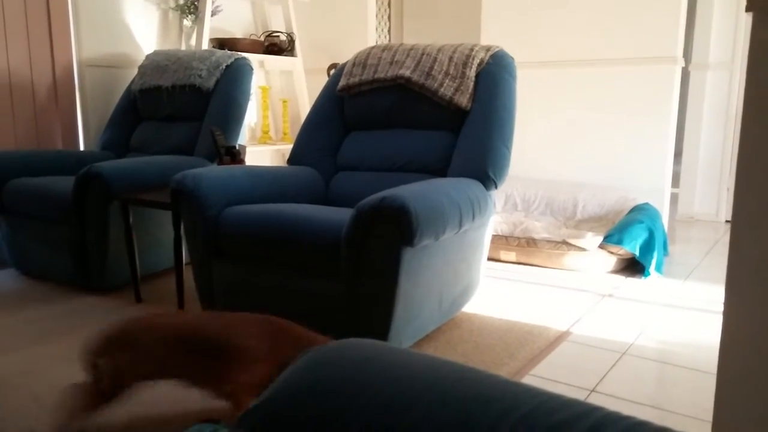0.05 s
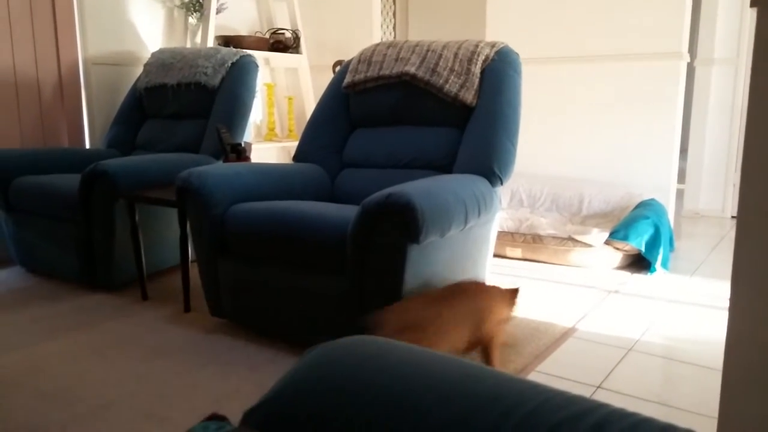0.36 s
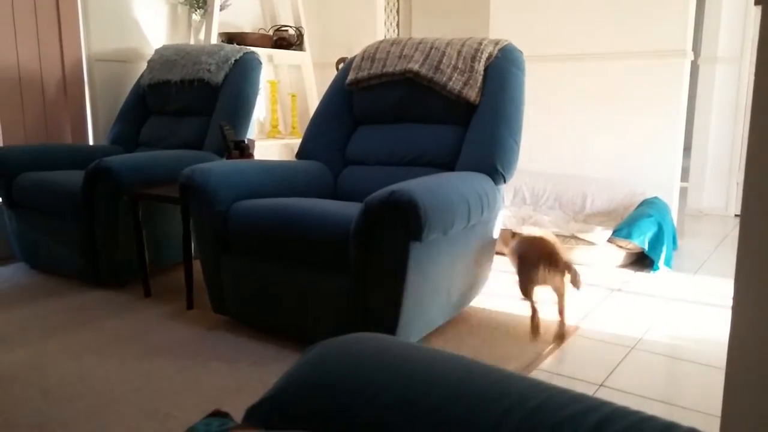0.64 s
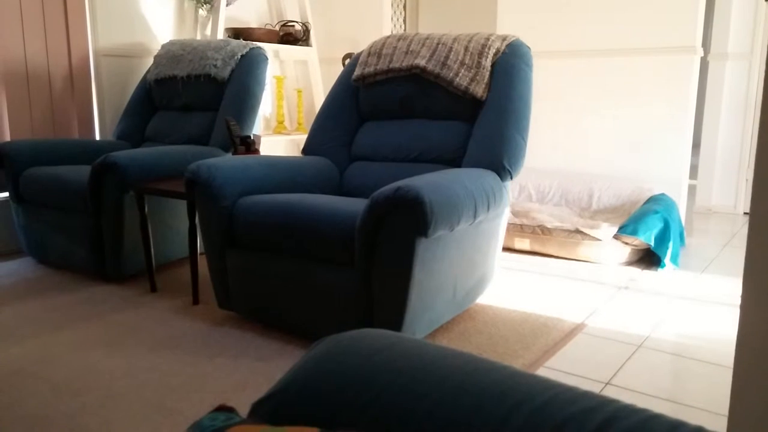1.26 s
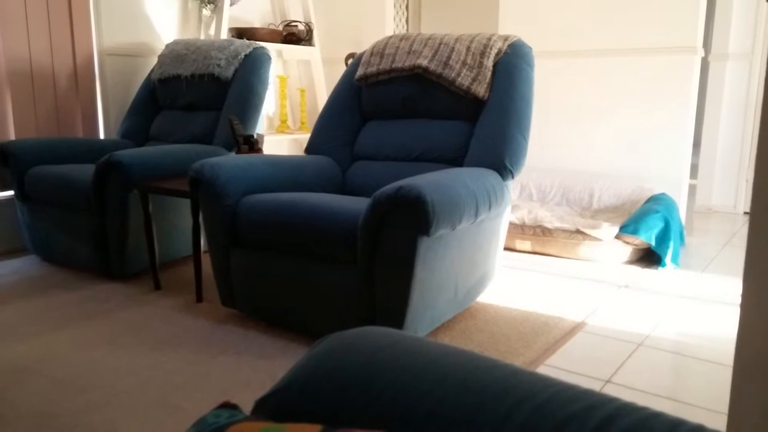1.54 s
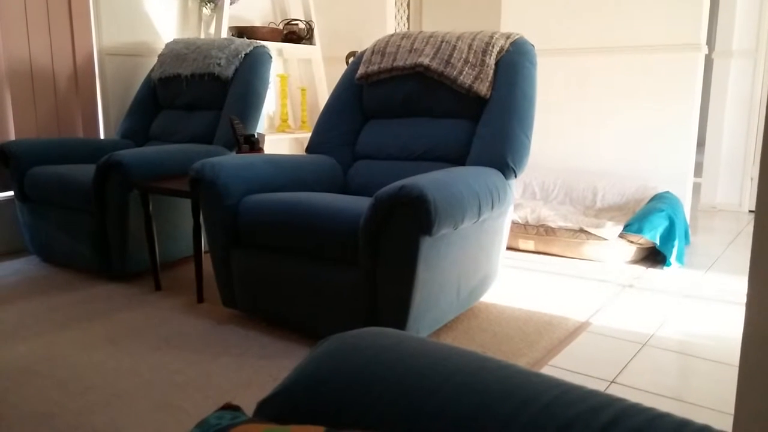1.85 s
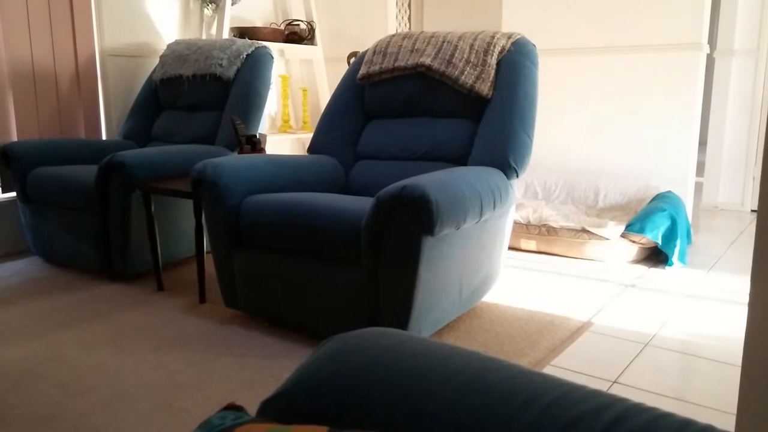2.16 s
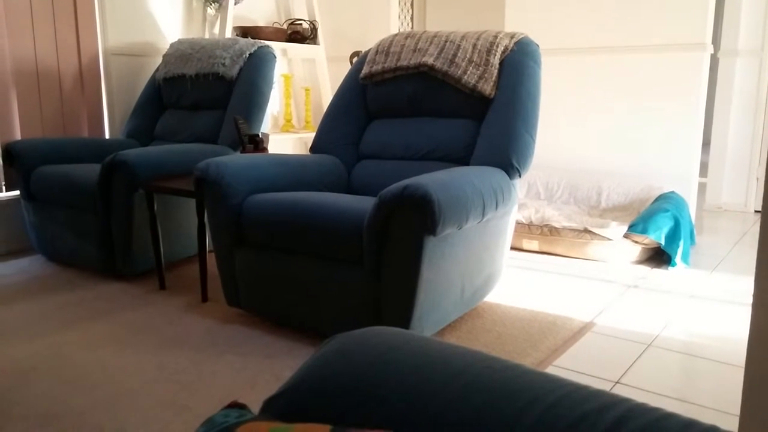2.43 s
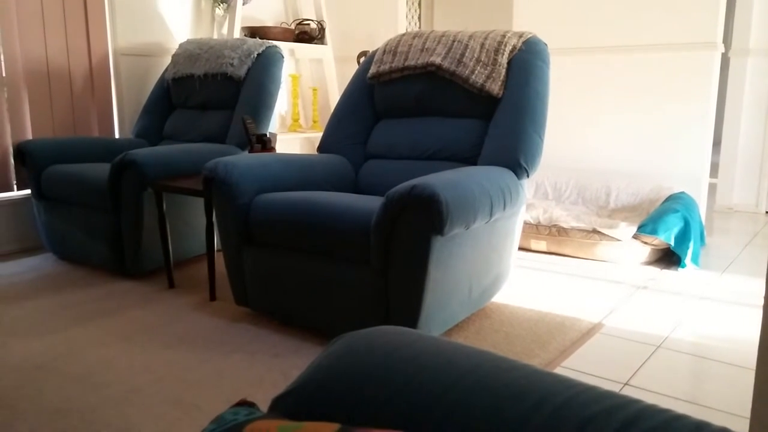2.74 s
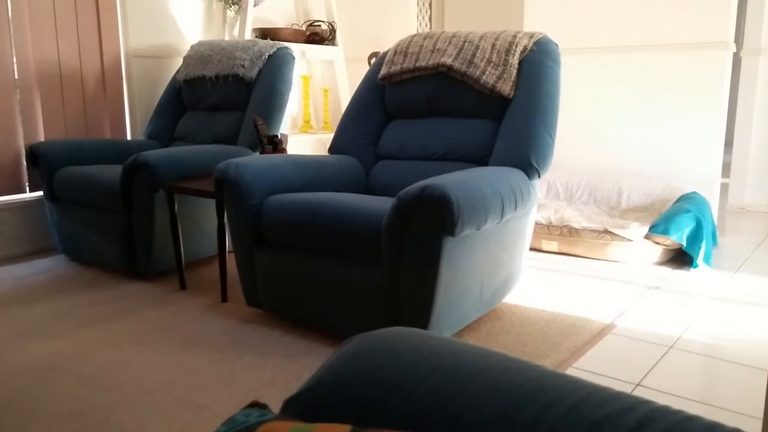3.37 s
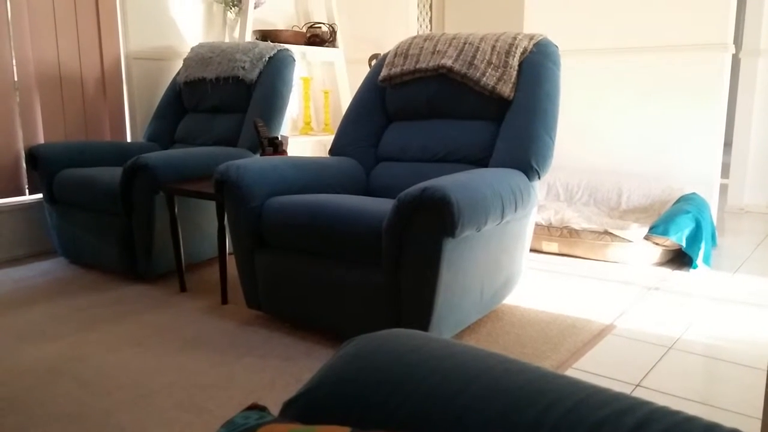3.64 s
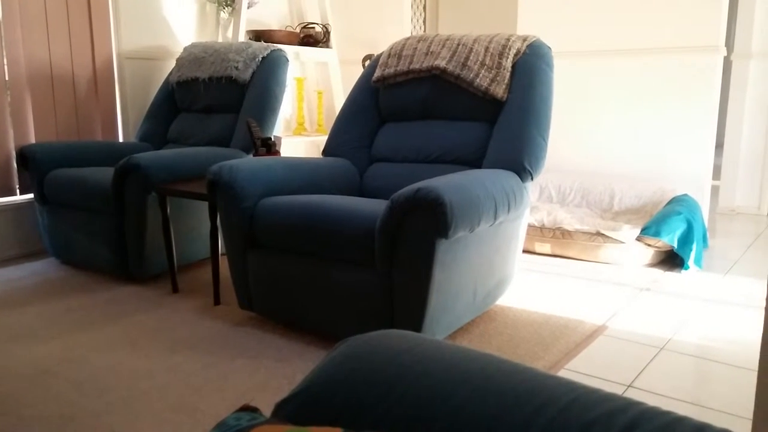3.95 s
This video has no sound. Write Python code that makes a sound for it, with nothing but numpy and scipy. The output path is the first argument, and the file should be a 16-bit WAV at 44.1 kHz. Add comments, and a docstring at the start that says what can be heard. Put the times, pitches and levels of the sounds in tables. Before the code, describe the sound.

A small dog dashes over carpet in a furnished room, paws thudding and scuffing as it huffs. At about 0.8 seconds it lands in rustling bedding with a brief whimper. A breathy, pulsing growl runs from 1.2 to 1.9 seconds, followed by more scuffling, huffs and grunts. It snorts near 3 seconds, then come faint, thin nose whistles, a sniff and a last soft grunt around 3.8 seconds.

```python
"""A small dog dashes over carpet, dives into its bedding and scuffles out of sight behind an armchair.
Its paws excite damped floor resonances; coat, claws and bedding make friction noise. It huffs,
whimpers, gives a long breathy growl, grunts, snorts, whistles thinly and sniffs: turbulent air,
smooth or chopped by loose throat tissue, is filtered by the resonances of throat, mouth and nose.
A furnished room reverberates, and a noise gate shuts in the pauses."""
import sys
import numpy as np
from scipy import signal
from scipy.fft import rfft, irfft, next_fast_len
from scipy.io import wavfile
from scipy.ndimage import uniform_filter1d

SR = 44100
rng = np.random.default_rng(int(sys.argv[2]) if len(sys.argv) > 2 else 0)


def put_to_file(sound):
    """Save the sound as 16-bit audio at rate SR, in the file named by the first command-line argument."""
    columns = np.atleast_2d(sound).T  # one column per channel
    safe = np.clip(columns, -1, 1)
    whole_steps = np.round(safe * 32767)
    wavfile.write(sys.argv[1], SR, whole_steps.astype(np.int16))


N = 176400

# footfalls: t/s, level/dB, f/Hz
FOOTFALLS = [(.078, -26.5, 327), (0.098, -35.5, 330), (0.144, -35, 260), (.221, -30, 343), (.245, -27, 493),
             (0.3089, -23, 420), (0.3326, -24, 385), (.381, -30, 480), (0.412, -29, 300),
             (.636, -30.5, 347), (0.821, -33.5, 150), (1.146, -36.5, 118.6), (1.218, -32.5, 466),
             (2.122, -30.5, 305), (1.822, -34, 307), (1.91, -39.5, 261), (2.274, -35.5, 450),
             (2.305, -36, 404), (2.437, -37, 348), (3.82, -45, 140)]
# spectra of rubbing or breath, of low rumble and of the snorting nose: f/Hz, level/dB
RUB_SPECTRUM = [(50, -34), (130, -8), (270, -3), (550, -12.5), (1900, -10), (3200, -18), (6700, -29),
                (15500, -50.5)]
RUMBLE_SPECTRUM = [(25, -46), (50, -11), (80, 1), (160, 1), (260, -2), (400, -15.5), (900, -38)]
NASAL_SPECTRUM = [(300, -12.5), (1600, 4.5), (2400, -1), (3700, -3), (5000, -17), (6600, -8.5),
                  (10000, -28), (15000, -65.5)]
# muzzle resonances: f/Hz, bandwidth/Hz, level/dB
MUZZLE_FORMANTS = [(990, 220, -10), (1530, 480, -2), (2050, 430, 0)]


def amp(db):
    return 10 ** (np.asarray(db) / 20)


def unit(x):
    return x / np.sqrt(np.mean(x ** 2) + 1e-20)


def clock():
    return np.arange(N) / SR


def noise():
    return rng.standard_normal(N)


def along(points, hz):
    """Interpolation of (f/Hz, value) points on a logarithmic frequency axis."""
    f, v = np.transpose(points)
    return np.interp(np.log(hz + 1), np.log(f + 1), v)


def burst(start, length, rise, t60):
    """Envelope with linear attack, hold and exponential decay; all times in seconds."""
    first, last = int(np.clip(start * SR, 0, N)), int(np.clip((start + length + 2 * t60) * SR, 0, N))
    t, out = np.arange(first, last) / SR - start, np.zeros(N)
    out[first:last] = np.clip(t / rise, 0, 1) * amp(-60 * np.maximum(t - length, 0) / t60)
    return out


def filtered(x, response):
    """Linear filtering: the spectrum of x times a frequency response."""
    size = next_fast_len(N + 8192)
    return irfft(rfft(x, size) * response(np.fft.rfftfreq(size, 1 / SR)), size)[..., :N]


def coloured(x, spectrum):
    """Spectral shaping by (f/Hz, level/dB) points, to rms 1."""
    return unit(filtered(x, lambda hz: amp(along(spectrum, hz))))


def resonate(x, peaks):
    """Parallel fourth-order resonators (f/Hz, bandwidth/Hz, level/dB), to rms 1."""
    def response(f):
        return sum(amp(db) * (1j * f * width / (hz * hz - f * f + 1j * f * width)) ** 2
                   for hz, width, db in peaks)
    return unit(filtered(x, response))


def glide(x, hz, width_hz):
    """A moving resonance by heterodyning: shift down, low-pass, shift back, to rms 1."""
    carrier = np.exp(2j * np.pi * np.cumsum(hz) / SR)
    lowpass = signal.butter(2, width_hz / 2, fs=SR, output="sos")
    return unit((signal.sosfilt(lowpass, x / carrier) * carrier).real)


def grainy(share, rate):
    """Friction noise with a share of its power in random slips, rate per second."""
    return np.sqrt(1 - share) * noise() + np.sqrt(share) * unit(noise() * (rng.random(N) < rate / SR))


def wobble(rate):
    """Piecewise linear random modulation, rate knots per second."""
    count = int(N / SR * rate) + 2
    return np.interp(clock() * rate, np.arange(count), rng.standard_normal(count))


def flutter(depth_db, rate_hz=94.9):
    """Amplitude modulation: loose throat tissue chops the airflow into uneven decaying pulses."""
    phase = np.cumsum(rate_hz * np.exp(0.3 * wobble(70))) / SR
    return unit(noise() * amp(-depth_db * (phase % 1) + 0.57 * wobble(45)))


def floor_ring(x, hz, spread=1.17):
    """Heavy damping makes the resonance of a paw on the floor broad and dull."""
    band_hz = [hz / (1 + spread), hz * (1 + spread / 2)]
    return signal.sosfilt(signal.butter(2, band_hz, "band", fs=SR, output="sos"), x)


def scuffs():
    """Sliding friction of coat and paws gives strokes of grainy noise."""
    strokes = [(0, 0.09, -32.5), (0.115, 0.038, -27.5), (0.162, 0.033, -36.5), (0.289, 0.13, -34.5),
               (0.637, 0.092, -40.5), (2.132, 0.07, -39.5), (2.423, 0.094, -35.5)]  # t/s, duration/s, level/dB
    envelope = sum(amp(db) * burst(t, length, rise=0.0026, t60=0.27) for t, length, db in strokes)
    return envelope * coloured(grainy(0.25, rate=500), RUB_SPECTRUM)


def scratches():
    """Stick-slip friction of dragging claws excites one band per stroke."""
    strokes = [(.042, .018, -27, 1950), (.386, .035, -39, 3300), (1.353, .014, -42, 7900),
               (2.137, .014, -41, 3200), (2.166, .016, -44, 4300), (2.357, .015, -35, 3600)]  # t/s, duration/s, level/dB, f/Hz
    slips, width_hz = grainy(0.97, rate=640), 1400
    return sum(amp(db) * burst(t, length, rise=0.0026, t60=0.072) * resonate(slips, [(hz, width_hz, 0)])
               for t, length, db, hz in strokes)


def thuds():
    """Impacts of paws and body: a damped floor resonance and a brief contact slap."""
    rise_s, t60_s, slap_t60_s, slap_db, slap_hz = 0.0014, 0.1, 0.01, -1.5, 2600
    out, count = np.zeros(N + SR), SR // 4
    t = np.arange(count) / SR
    envelope = (1 - np.exp(-t / rise_s)) * amp(-60 * t / t60_s)
    lowpass = signal.butter(2, slap_hz, fs=SR, output="sos")
    for start, db, hz in FOOTFALLS:
        ring = floor_ring(rng.standard_normal(count), hz)
        knock = unit(ring * envelope) * np.sqrt(np.mean(envelope ** 2))
        slap = signal.sosfilt(lowpass, rng.standard_normal(count) * amp(-60 * t / slap_t60_s))
        out[int(start * SR):][:count] += amp(db) * (knock + amp(slap_db) * slap)
    return out[:N]


def first_pushes(boost_db=9.5):
    """The impulse response of the floor gives each footfall its coherent onset."""
    out = np.zeros(N + SR)
    for t, db, hz in FOOTFALLS:
        push = floor_ring(signal.unit_impulse(SR // 10), hz)
        out[int(t * SR):][:len(push)] += amp(db + boost_db) * push / push.max()
    return out[:N]


def claw_ticks():
    """Short, hard contacts have a broad, bright spectrum."""
    ticks = [(.166, -36), (0.223, -32), (.652, -28.5), (0.952, -32), (1.323, -37)]  # t/s, level/dB
    spectrum = [(500, -30.5), (2500, 12), (7000, 5.5), (10000, -6.5), (15000, -39.5)]  # f/Hz, level/dB
    envelope = sum(amp(db) * burst(t, 0.0019, rise=0.00043, t60=0.018) for t, db in ticks)
    return envelope * coloured(noise(), spectrum)


def huffs():
    """Source and filter: puffs excite muzzle formants that rise as it opens, and hiss at the nose."""
    puffs = [(0.243, 0.068, -34, -8, 0.9), (0.525, 0.09, -36, -9, 0.88), (1.123, 0.11, -37, -5.5, 0.88),
             (2.03, 0.072, -40.5, -15, 0.88), (2.336, 0.047, -39, -6, 0.813),
             (2.445, 0.094, -39.5, -16.5, 0.85)]  # t/s, duration/s, level/dB, relative hiss/dB, initial tuning ratio
    hiss_spectrum = [(1500, -32), (2600, -3.5), (3400, 6), (5000, -3), (6800, -2), (9000, -7.5),
                     (11000, -20), (15000, -40.5)]  # f/Hz, level/dB
    opening_per_s, waver_db = 1.1, 2
    tuning, source, now = np.ones(N), flutter(depth_db=6), clock()
    for t, length, _, _, ratio in puffs:
        tuning = np.where(now < t, tuning, ratio * (1 + opening_per_s * np.minimum(now - t, length)))
    muzzle = unit(sum(amp(db + waver_db * wobble(20)) * glide(source, hz * tuning, width)
                      for hz, width, db in MUZZLE_FORMANTS))
    breath = muzzle + amp(-7) * coloured(source, RUB_SPECTRUM)
    hiss = coloured(noise(), hiss_spectrum)
    return sum(amp(db) * burst(t, length, rise=0.02, t60=0.1) * (breath + amp(hiss_db) * hiss)
               for t, length, db, hiss_db, _ in puffs)


def dive():
    """A cushioned impact: the bedding rustles by friction and thumps under the dog."""
    bedding_spectrum = [(150, -51), (300, -3.5), (850, 0.5), (1200, -6), (2200, -2.5), (4600, -11.5),
                        (6700, -5.5), (9500, -13.5), (11500, -22), (15500, -27)]  # f/Hz, level/dB
    rustle = amp(-28) * coloured(grainy(0.59, rate=2100), bedding_spectrum)
    thump = amp(-34.5) * coloured(noise(), RUMBLE_SPECTRUM)
    return burst(start=0.75, length=0.18, rise=0.094, t60=0.38) * (rustle + thump)


def whimper():
    """Breath noise in a narrow, falling resonance squeaks as the dog lands."""
    start_s, length_s, onset_hz, sag_hz_per_s = 0.792, 0.082, 1024, 1200
    hz = onset_hz - sag_hz_per_s * np.clip(clock() - start_s, 0, 2 * length_s)
    return amp(-32.5) * burst(start_s, length_s, rise=0.013, t60=0.17) * glide(noise(), hz, width_hz=130)


def chest_rumble():
    """The low band of a pulsating airflow wavers under the growl."""
    rumble = coloured(flutter(depth_db=9), RUMBLE_SPECTRUM) * unit(amp(1.9 * wobble(24.84)))
    return amp(-40) * burst(start=1.143, length=0.75, rise=0.0053, t60=0.17) * rumble


def growl():
    """Pulsating air excites fixed throat formants, three that move with the mouth, and nasal hiss."""
    pushes = [(1.264, 0.057, -25.5, -9, -12), (1.34, 0.041, -30.5, -3.5, -8.5), (1.428, 0.04, -31, 0, -14),
              (1.474, 0.064, -31.5, -2.5, -8), (1.552, 0.095, -35, -7, -6.5), (1.67, 0.046, -42, 0.5, -13),
              (1.731, 0.072, -36.5, -13, -16), (1.865, 0.043, -39.5, -12, -27)]  # t/s, duration/s, level/dB, relative throat/dB, relative treble/dB
    throat_formants = [(493, 72, 5.5), (725, 87, 0.5)]  # f/Hz, bandwidth/Hz, level/dB
    formant_path = [(1.28, 1214, 1550), (1.371, 1184, 1820), (1.45, 1040, 1790), (1.549, 1230, 1960),
                    (1.63, 1385, 1600), (1.79, 1205, 1900), (1.92, 1210, 1680)]  # t/s, mouth f/Hz, upper f/Hz
    lower_ratio, fade_db_per_s = 0.763, 34.5
    times, *tracks = np.transpose(formant_path)
    mouth_hz, upper_hz = [np.interp(clock(), times, hz) for hz in tracks]
    source = flutter(depth_db=14)
    throat = resonate(source, throat_formants)
    lower_db = -1.5 - fade_db_per_s * np.maximum(clock() - times[0], 0)
    lower = amp(lower_db) * glide(flutter(depth_db=14), lower_ratio * mouth_hz, width_hz=230)
    mouth = glide(source, mouth_hz, width_hz=230) + lower
    hiss = amp(2.5) * coloured(flutter(depth_db=10.5), NASAL_SPECTRUM)
    treble = glide(source, upper_hz, width_hz=200) + hiss
    return sum(amp(db) * burst(t, length, rise=0.0053, t60=0.095)
               * (mouth + amp(throat_db) * throat + amp(treble_db) * treble)
               for t, length, db, throat_db, treble_db in pushes)


def grunts():
    """Rough puffs each excite one heavily damped throat resonance and, faintly, the muzzle."""
    puffs = [(2.602, 0.034, -40.5, 626), (2.666, 0.049, -40, 502), (2.848, 0.012, -35.5, 690),
             (3.273, 0.015, -40, 313), (3.847, 0.072, -41.5, 550)]  # t/s, duration/s, level/dB, f/Hz
    source = flutter(depth_db=10)
    breath = amp(-33.5) * resonate(source, MUZZLE_FORMANTS)
    return sum(amp(db) * burst(t, length, rise=0.013, t60=0.17)
               * (resonate(source, [(hz, hz, 0)]) + breath) for t, length, db, hz in puffs)


def snort():
    """Tissue flutter swells to a rasp in the throat; turbulent air bursts out through the nose."""
    blasts = [(2.855, 0.097, -40), (3.065, 0.068, -30.5)]  # t/s, duration/s, level/dB
    throat_spectrum = [(50, -49), (180, 2.5), (550, 3.5), (980, 7.5), (1350, 0), (2000, -1), (3000, -47.5)]  # f/Hz, level/dB
    start_s, length_s, swell_db_per_s = 2.87, 0.25, 40
    rasp_db = -39 + swell_db_per_s * np.clip(clock() - start_s, 0, length_s)
    rasp = amp(rasp_db) * burst(start_s, length_s, rise=0.044, t60=0.18)
    blast = sum(amp(db) * burst(t, length, rise=0.044, t60=0.29) for t, length, db in blasts)
    throat = coloured(flutter(depth_db=8), throat_spectrum)
    nose = coloured(flutter(depth_db=1.5), NASAL_SPECTRUM)
    return rasp * throat + blast * nose


def nose_whistles():
    """Breath noise drives a narrow nasal resonance that rises and levels off."""
    whistles = [(3.153, 0.18, -47.5, 6570, 7220), (3.427, 0.18, -45.5, 6220, 7160),
                (3.652, 0.17, -57, 6200, 6580)]  # t/s, duration/s, level/dB, initial f/Hz, final f/Hz
    out = np.zeros(N)
    for t, length, db, from_hz, to_hz in whistles:
        progress = np.clip((clock() - t) / length, 0, 1)
        hz = from_hz + (to_hz - from_hz) * np.sin(np.pi / 2 * progress) ** 2
        out += amp(db) * burst(t, length, rise=0.07, t60=0.15) * glide(noise(), hz, width_hz=500)
    return out


def sniff():
    """Turbulence without flutter excites the resonances of the nostrils."""
    formants = [(596, 130, -3.5), (1440, 195, -5.5), (2070, 540, -5.5), (3220, 620, -12),
                (4300, 900, -11.5), (6760, 870, -17)]  # f/Hz, bandwidth/Hz, level/dB
    return amp(-39) * burst(start=3.565, length=0.1, rise=0.043, t60=0.16) * resonate(noise(), formants)


def dog():
    """Superposition of the dog's noise-driven sounds, with independent noise at each call."""
    movement = scuffs() + scratches() + thuds() + claw_ticks() + dive()
    voice = huffs() + whimper() + chest_rumble() + growl() + grunts()
    return movement + voice + snort() + nose_whistles() + sniff()


def reverberation(x):
    """Diffuse field: each channel is convolved with noise that decays exponentially in every band."""
    decay_times = [(100, 0.48), (3000, 0.3), (12000, 0.37)]  # f/Hz, T60/s
    hz, t, spectra = signal.stft(rng.standard_normal((2, SR // 2)), SR, nperseg=256)
    decay = amp(-60 * t / along(decay_times, hz)[:, None])
    tail = signal.istft(spectra * decay, SR, nperseg=256)[1]
    return signal.fftconvolve(x, tail / np.linalg.norm(tail[0]), axes=1)[:, :N]


def scatter(pair):
    """Scattering by furniture leaves left and right coherent only in the bass."""
    coherence = [(100, 0.94), (400, 0.89), (1000, 0.46), (2000, 0.004)]  # f/Hz, left-right correlation
    def weights(hz):
        angle = np.arccos(along(coherence, hz)) / 2
        return np.array([np.cos(angle), np.sin(angle)])
    mid, side = filtered(pair, weights)
    return np.array([mid + side, mid - side])


def place(stereo, lag_s=0.0001):
    """Level and time differences between the channels: the left is louder and slightly later."""
    left_excess = [(60, 1), (180, 5), (4000, 7), (15000, 0.5)]  # f/Hz, left minus right level/dB
    sides = np.array([[0.5], [-0.5]])
    return filtered(stereo, lambda hz: amp(along(left_excess, hz) * sides)
                    * np.exp(-2j * np.pi * hz * lag_s * sides))


def scene():
    """Direct sound, reverberant field and steady background noise add and spread into stereo."""
    background_spectrum = [(25, -8), (70, 7.5), (600, -6), (4000, -21.5), (9000, -14), (15000, -47.5)]  # f/Hz, level/dB
    pair = np.array([dog() + first_pushes(), dog()])  # mid and side
    background = amp(-54.5) * coloured(np.array([noise(), noise()]), background_spectrum)
    return place(scatter(amp(-2) * pair + amp(-4) * reverberation(pair) + background))


def record(dry):
    """Downward expansion: a noise gate turns quiet moments down; a band limit cuts the top treble."""
    threshold_db, range_db, slope, window_s, top_hz = -43, 25, 3.23, 0.025, 15900
    power = uniform_filter1d(np.mean(dry ** 2, axis=0), int(window_s * SR))
    level_db = 10 * np.log10(np.abs(power) + 1e-12)
    gain_db = np.clip(slope * (level_db - threshold_db), -range_db, 0)
    gain = amp(uniform_filter1d(gain_db, size=441))  # smoothed over 10 ms
    return filtered(dry * gain, lambda hz: hz < top_hz)


dry = scene()
out = record(dry)
put_to_file(out)
```